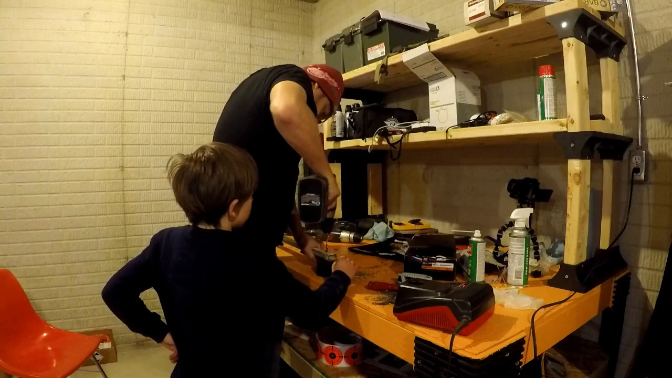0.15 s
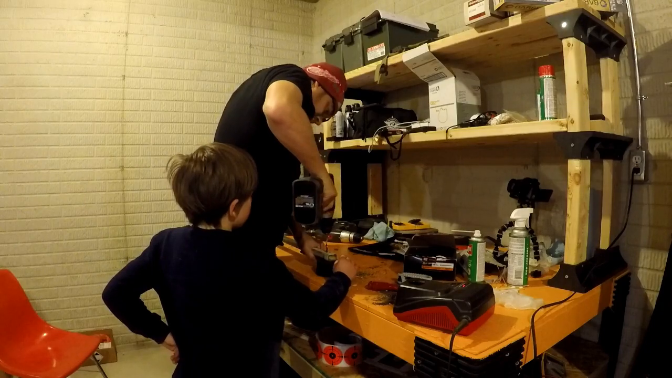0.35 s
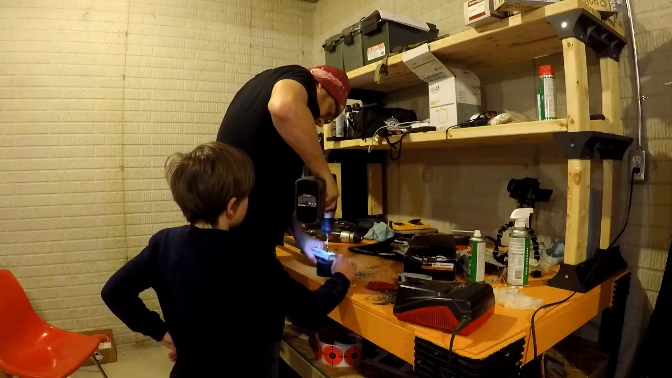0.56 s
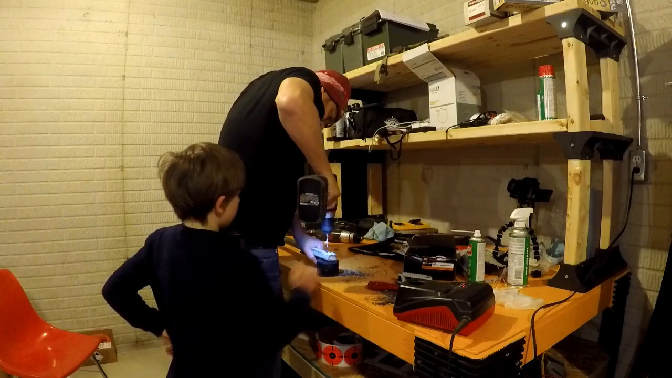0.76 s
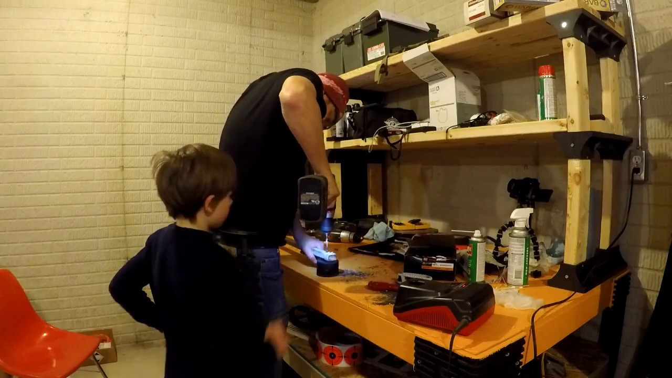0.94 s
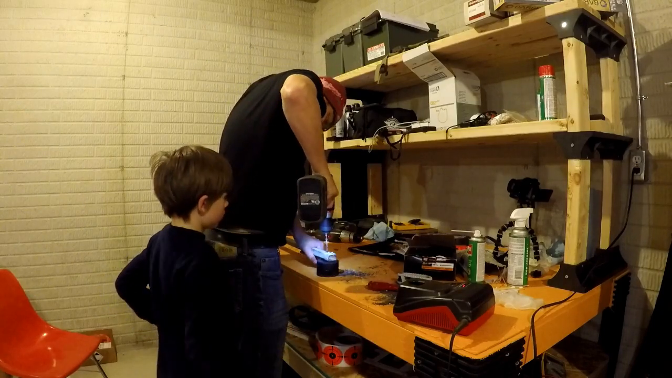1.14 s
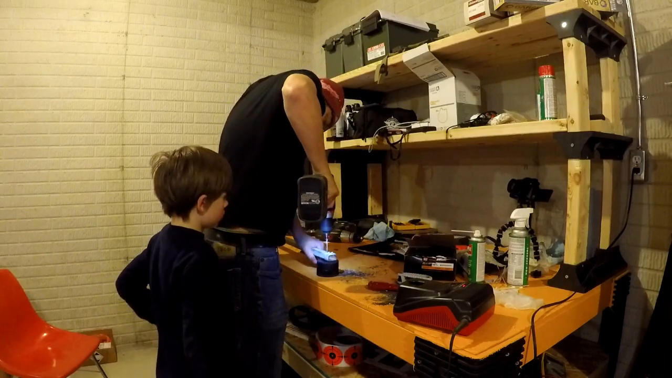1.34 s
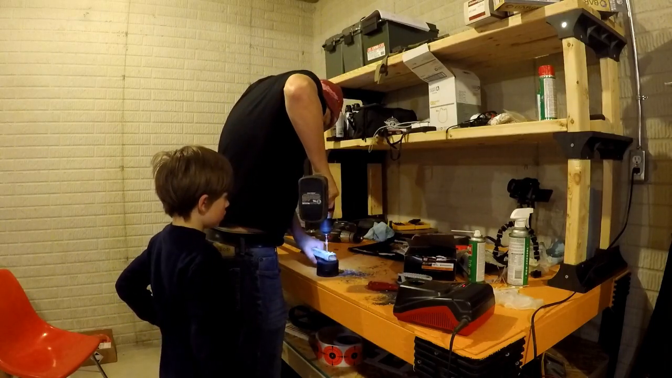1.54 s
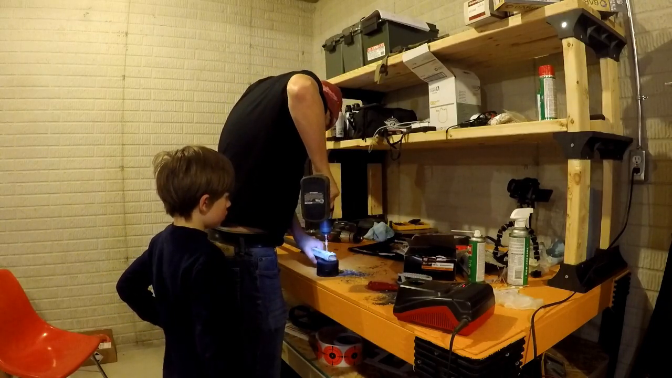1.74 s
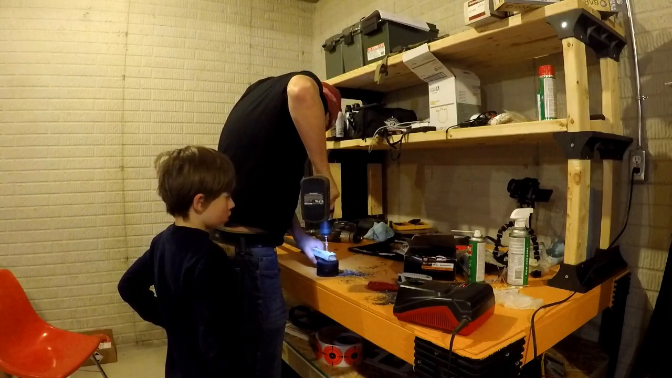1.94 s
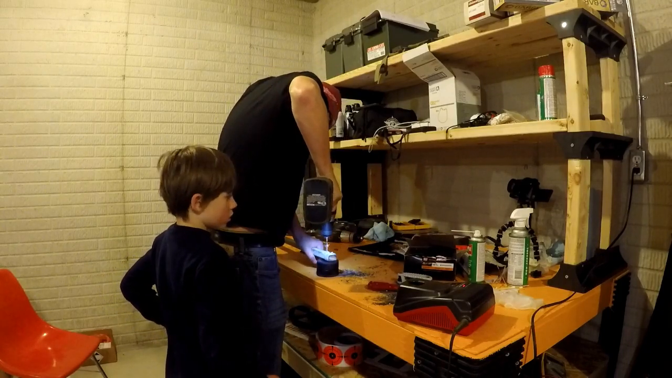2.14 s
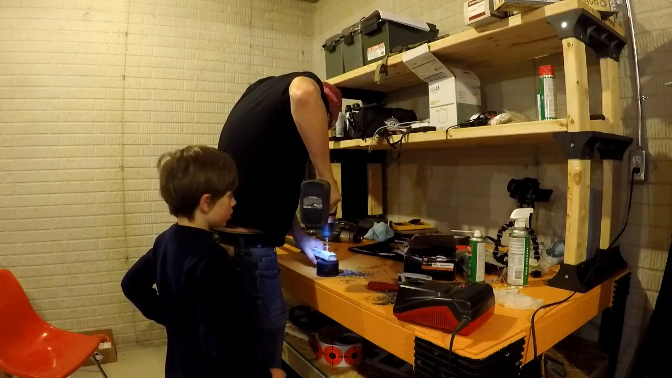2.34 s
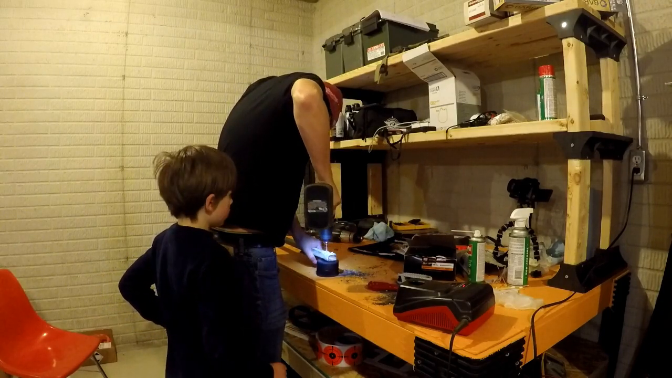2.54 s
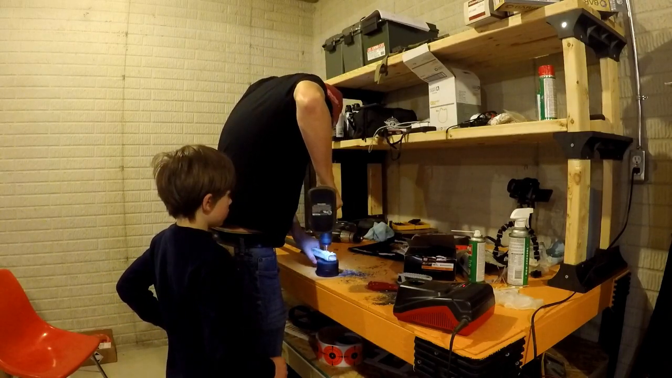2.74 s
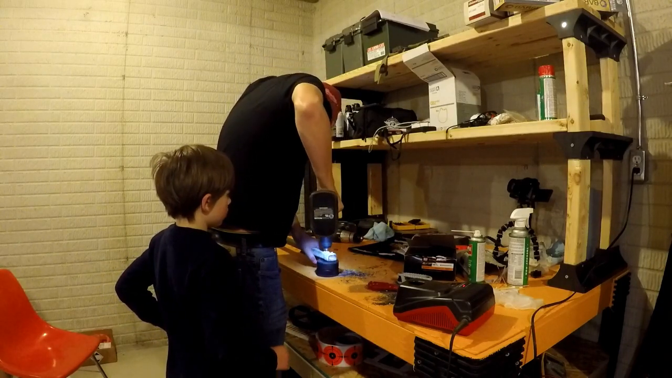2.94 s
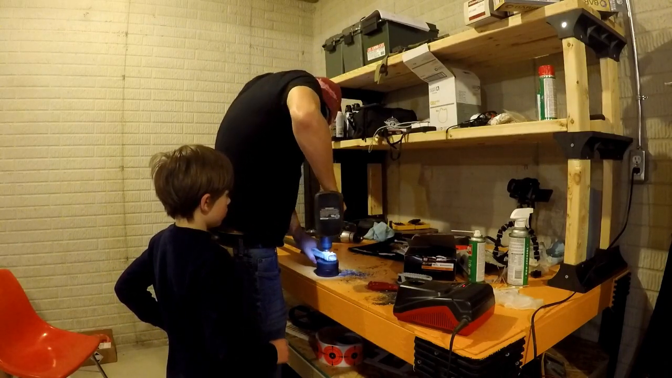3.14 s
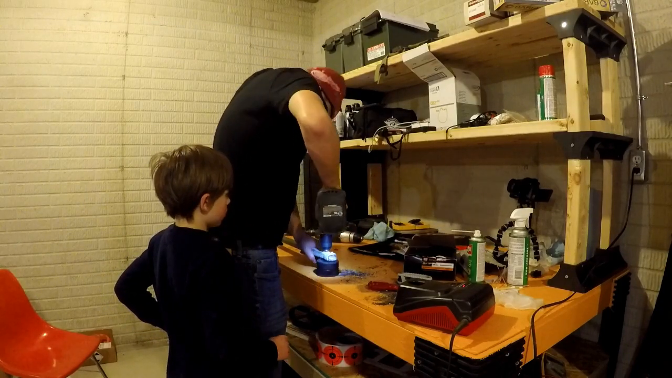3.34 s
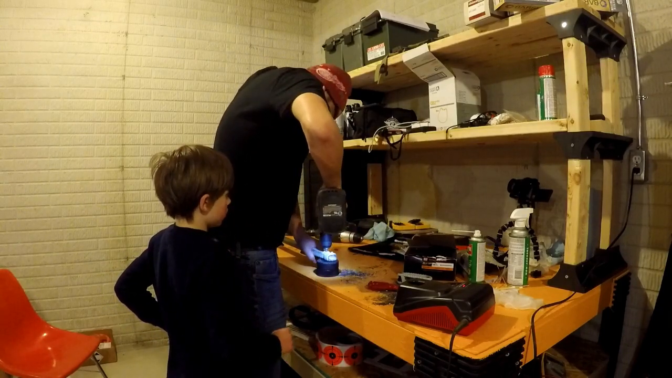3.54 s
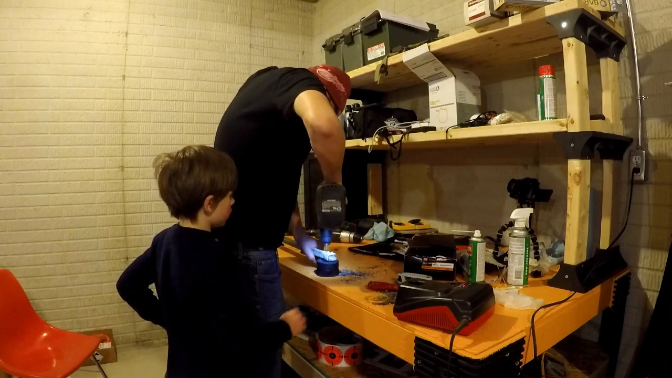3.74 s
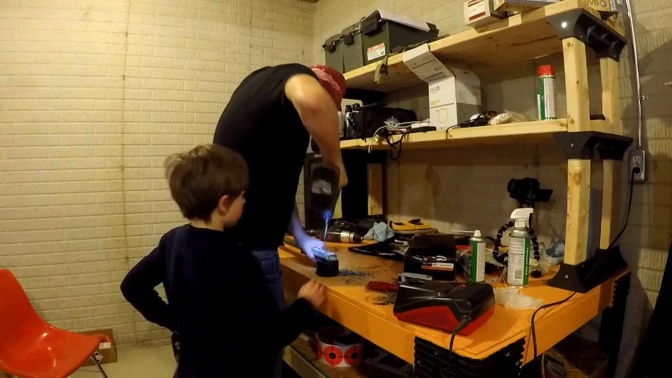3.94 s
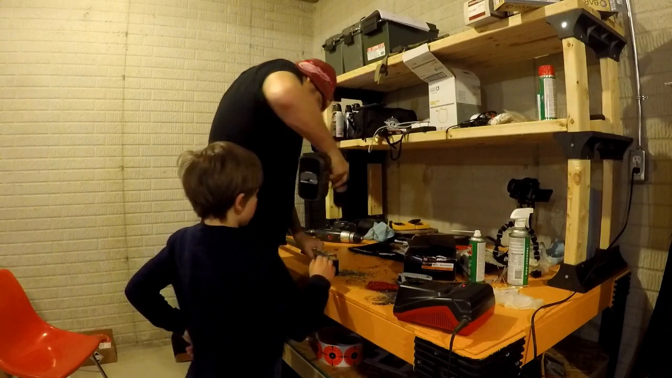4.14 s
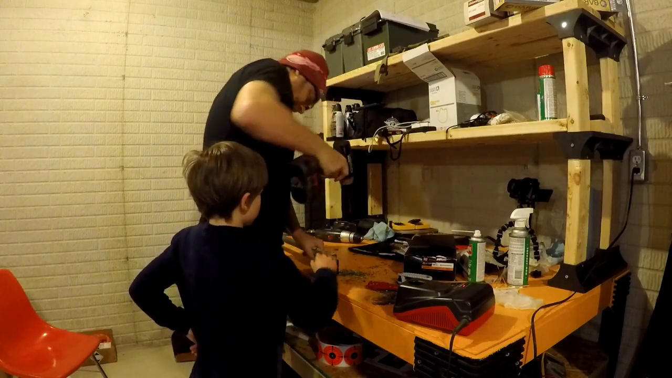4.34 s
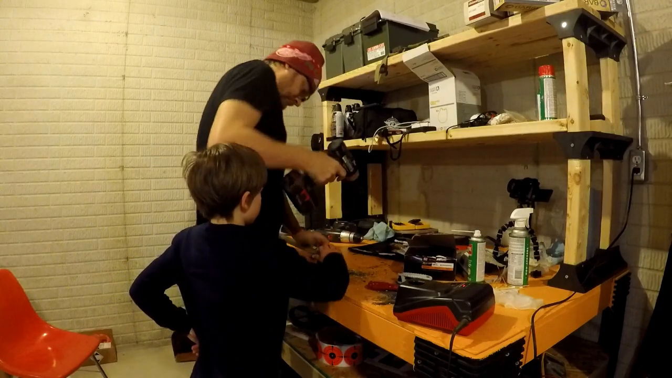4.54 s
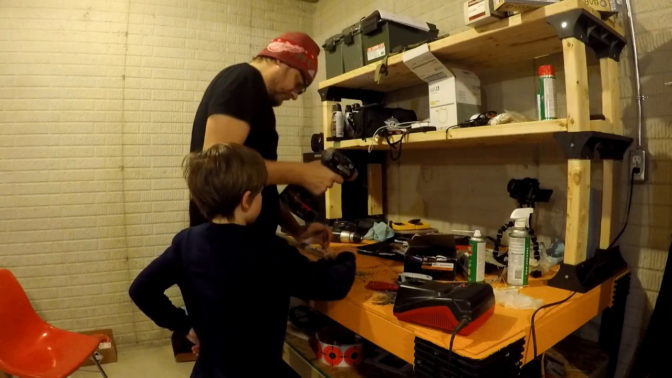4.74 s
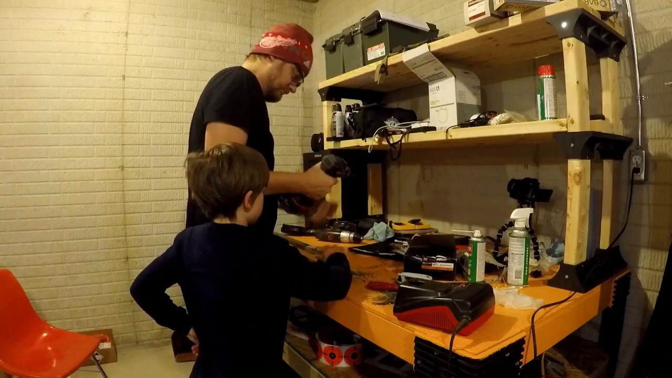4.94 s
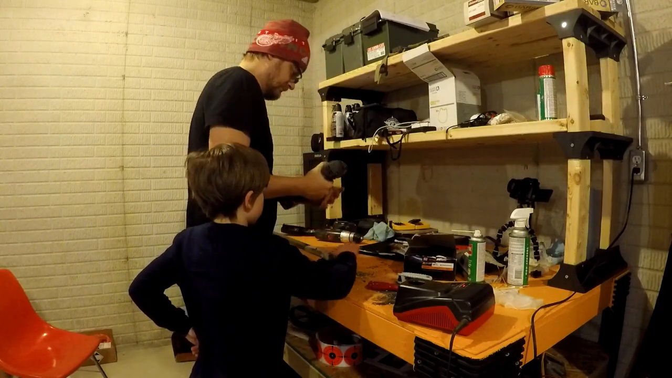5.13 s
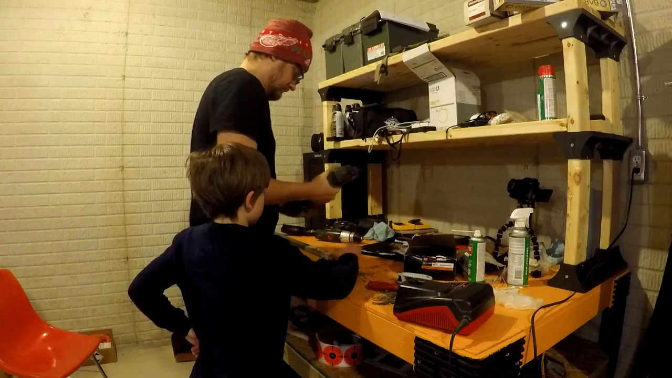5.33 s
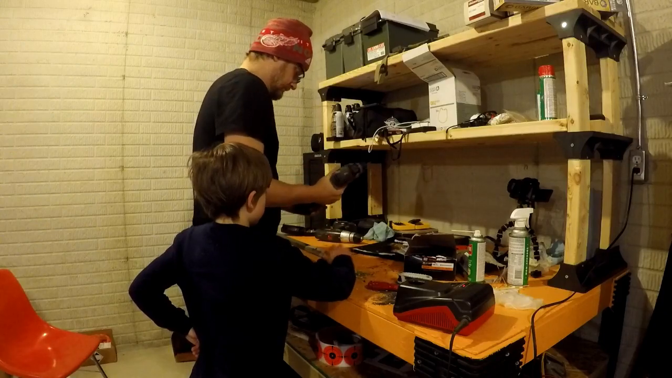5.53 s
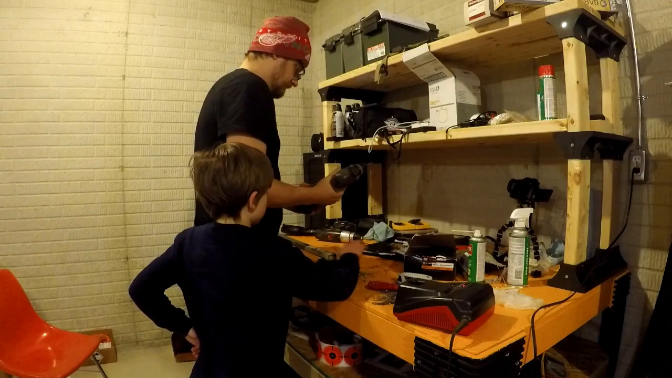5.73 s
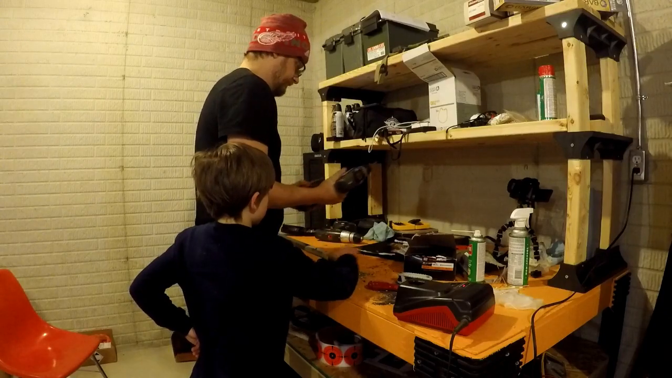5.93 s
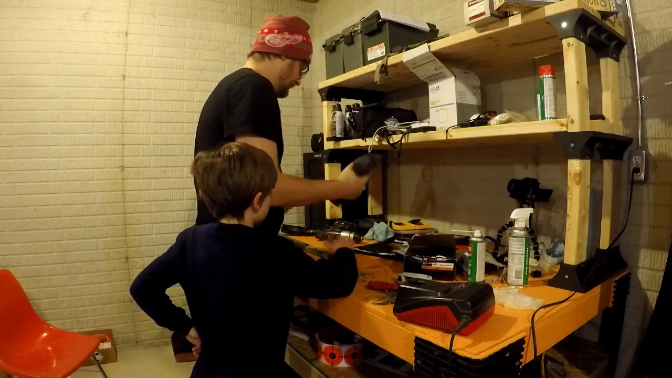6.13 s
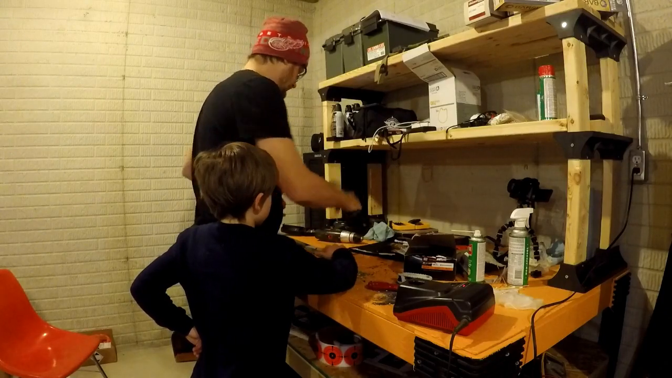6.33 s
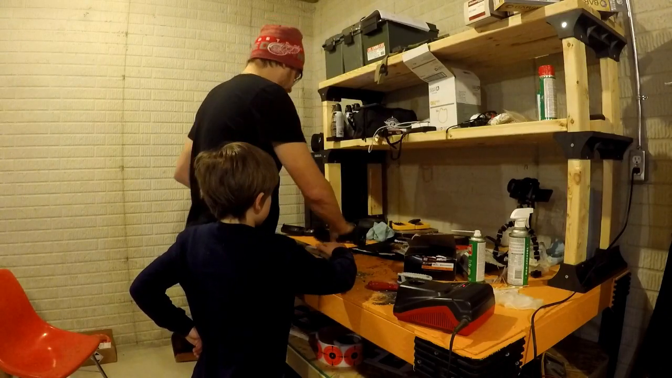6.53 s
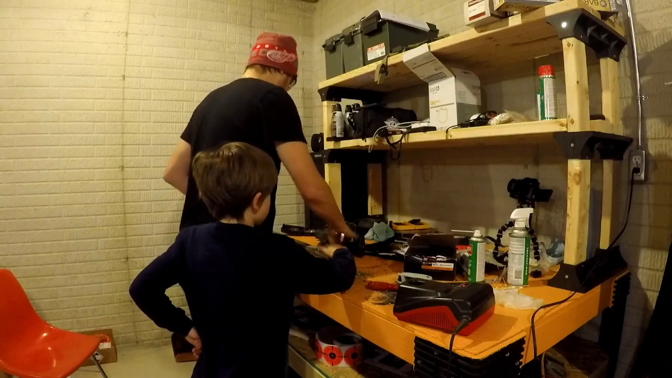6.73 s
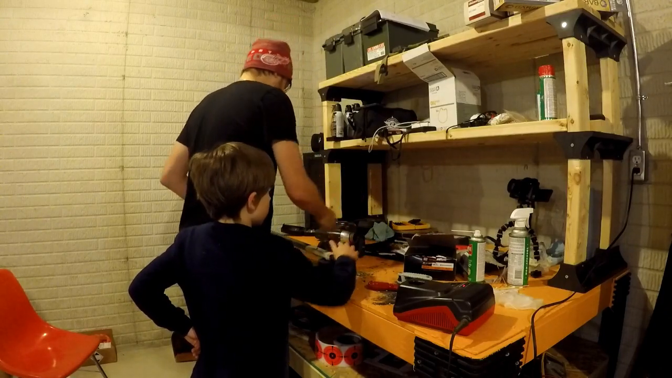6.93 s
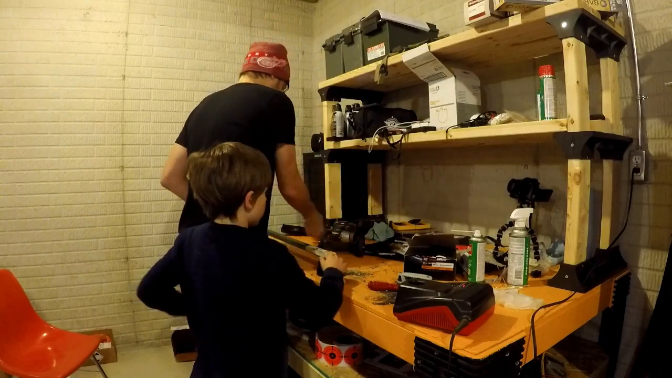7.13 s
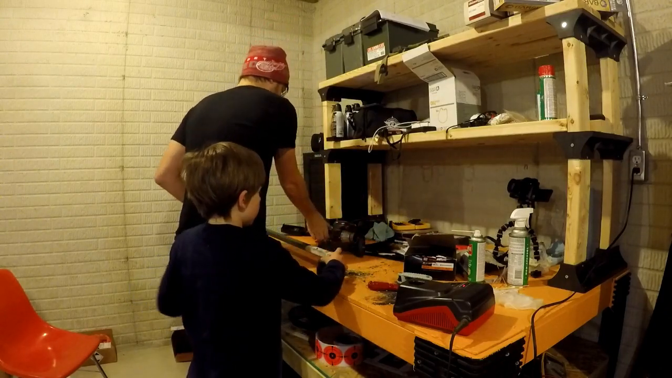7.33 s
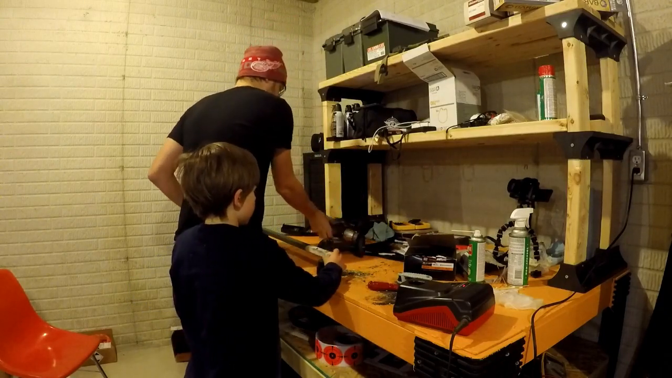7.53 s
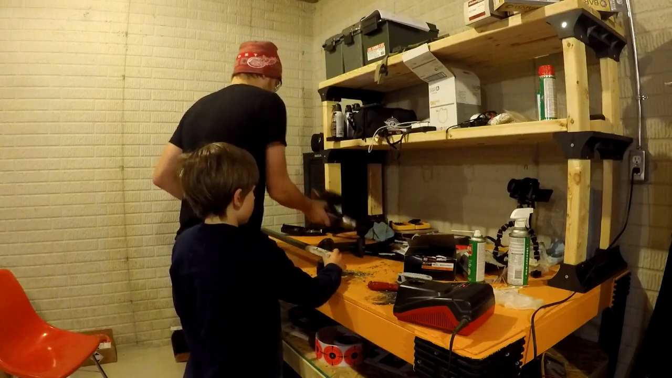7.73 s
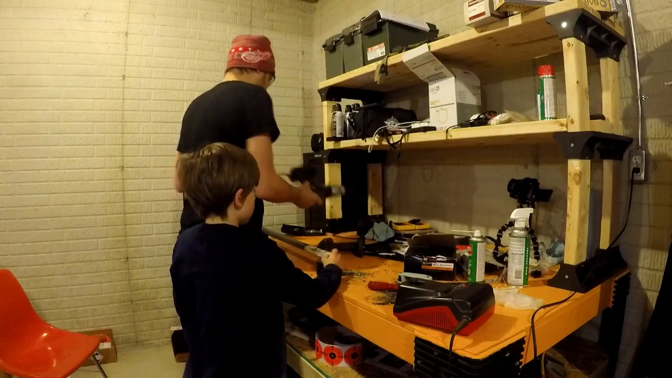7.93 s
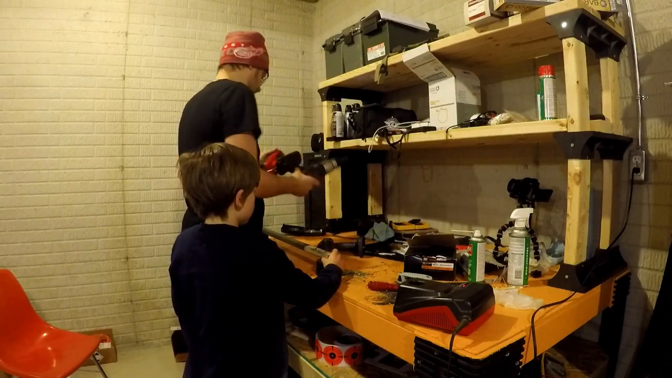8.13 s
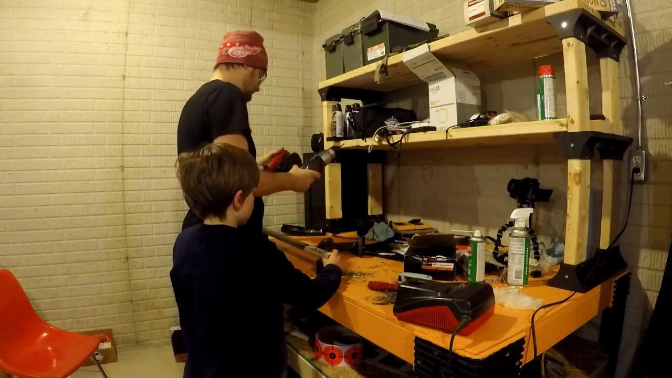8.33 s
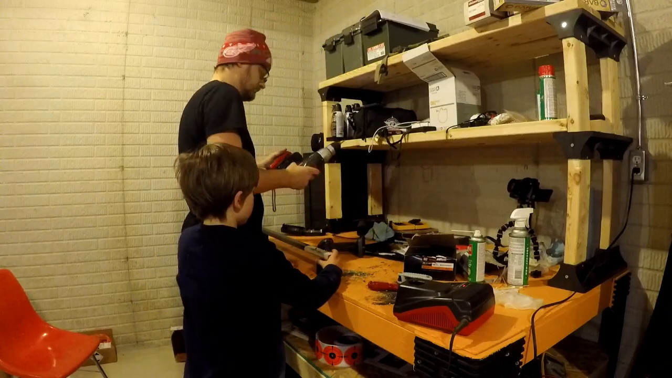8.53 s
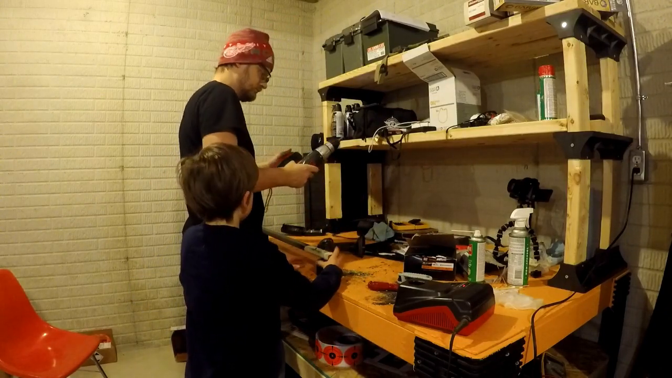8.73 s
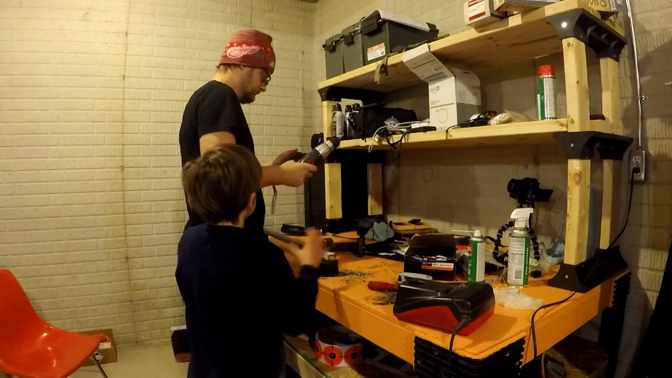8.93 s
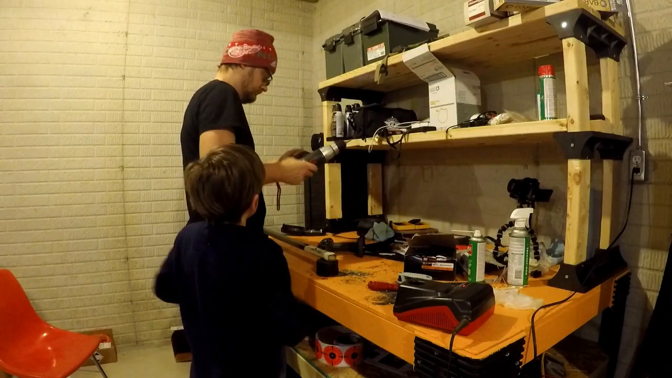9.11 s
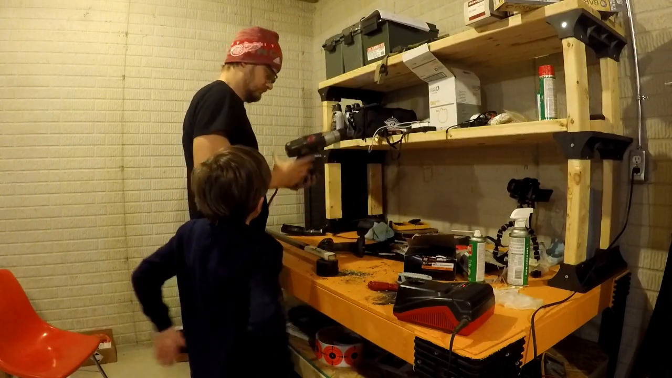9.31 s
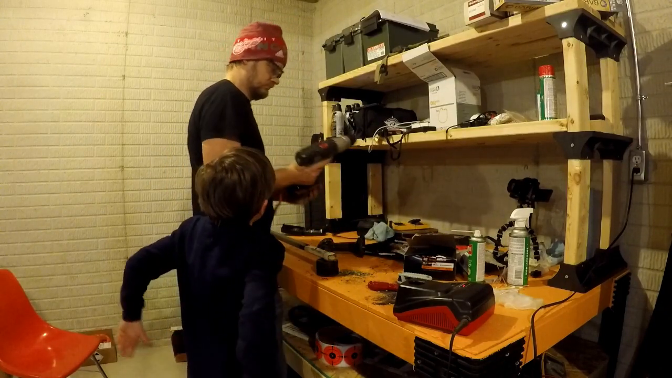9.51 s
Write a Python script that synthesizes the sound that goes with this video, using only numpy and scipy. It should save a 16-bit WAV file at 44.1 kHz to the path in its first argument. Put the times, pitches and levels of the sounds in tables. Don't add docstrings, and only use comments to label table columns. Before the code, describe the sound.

Whirring drill with shrill gear whine drives a screw in a brick basement, brakes sharply, followed by quiet, heavy set-down thuds and crisp latch snaps.

```python
import sys
import numpy as np
from scipy import signal
from scipy.fft import rfft, irfft
from scipy.io import wavfile
from scipy.ndimage import uniform_filter1d

SR = 44100
rng = np.random.default_rng(int(sys.argv[2]) if len(sys.argv) > 2 else 0)


def voltage_ratio(level):
    return 10 ** (np.asarray(level, float) / 20)


def digitize_waveform(pressure):
    field = np.atleast_2d(pressure).T
    bounded = np.clip(field, -1, 1)
    quanta = np.round(bounded * 32767).astype(np.int16)
    wavfile.write(sys.argv[1], SR, quanta)


N = 422037
TIME = np.arange(N) / SR
FULL_S = 1.12

# (time [s], level [dB])
LEAN = [(1.1, -75), (1.7, -51), (1.97, -22.5), (2.38, -17.5), (2.72, -25.5), (3.1, -37.5), (3.7, -25.5),
        (3.95, -23.5), (4.42, -58.5), (5.7, -68), (6.3, -74)]


def evened(x):
    return x / np.sqrt(np.mean(x ** 2) + 1e-20)


def read(points, hz):
    f, value = np.transpose(points)
    return np.interp(np.log(hz + 1), np.log(f + 1), value)


def level_curve(rows):
    s, db = np.transpose(rows)
    return np.interp(TIME, s, db, -120, -120)


def add(mix, s, sound):
    place = mix[round(s * SR):][:len(sound)]
    place += sound[:len(place)]


def resonate(x, hz, width):
    turn = np.exp(2j * np.pi * np.cumsum(hz * np.ones(x.shape[-1])) / SR)
    r = np.exp(-np.pi * width / SR)
    return 2 * (turn * signal.lfilter([1 - r], [1, -r], x / turn)).real


def noise(spectrum, patchy_db, likeness=1.0):
    # (frequency [Hz], likeness [0-1])
    port_likeness = [(60, 0.88), (130, 0.9), (290, 0.6), (640, 0.69), (1410, 0.13), (3100, 1), (6000, 0.49),
                     (9000, 0.32), (13000, 0.8)]
    hz = np.fft.rfftfreq(1024, 1 / SR)
    a, b, c, d, patches = rng.standard_normal((N // 256 + 5, 513, 5)).T
    patches = uniform_filter1d(patches, size=6, axis=0)
    patches = evened(uniform_filter1d(patches, size=10, axis=1))
    same = np.clip(likeness * read(port_likeness, hz), 0, 1)[:, None]
    left = a + 1j * b
    right = same * left + np.sqrt(1 - same ** 2) * (c + 1j * d)
    z = np.array([left, right]) * voltage_ratio(read(spectrum, hz)[:, None] + patchy_db * patches)
    return evened(signal.istft(z, nperseg=1024, noverlap=768)[1][:, :N])


def port(x):
    # (frequency [Hz], gain [dB])
    air_response = [(60, -67), (140, 2.5), (250, 2.5), (2500, -0.5), (2750, -4.5), (3100, -1), (4000, -2.5),
                    (5000, -5), (6300, 2), (7500, -4.5), (9000, -8.5), (11500, -18), (16000, -37)]
    return irfft(rfft(x) * voltage_ratio(read(air_response, np.fft.rfftfreq(N, 1 / SR))), N)


def room(x):
    # (frequency [Hz], t60 [s])
    decay = [(100, 0.22), (500, 0.96), (2000, 0.85), (6000, 0.62), (12000, 0.52)]
    taps = np.zeros((2, SR))
    at = np.arange(200, SR - 20, 20) + rng.integers(0, 20, (2, (SR - 201) // 20))
    np.put_along_axis(taps, at, rng.choice([-1., 1.], at.shape), 1)
    taps[1] = 0.33 * taps[0] + 0.92 * taps[1]
    hz, t, z = signal.stft(taps, SR, nperseg=256)
    tail = signal.istft(z * voltage_ratio(-60 * t / read(decay, hz)[:, None]), SR, nperseg=256)[1]
    bass = signal.butter(2, 220, fs=SR, output="sos")
    tail[1] += signal.sosfilt(bass, tail[0] - tail[1])
    return signal.fftconvolve(x[None], tail / np.linalg.norm(tail[0]), axes=1)[:, :N]


def room_tone():
    # (frequency [Hz], level [dB per Hz])
    tone_colour = [(30, -27), (70, -15), (105, -61), (150, 4), (220, -0.5), (300, -5), (480, -11),
                   (800, -14), (3500, -23.5), (5000, -27), (6400, -23.5), (9900, -28.5), (12500, -38.5),
                   (15500, -44)]
    level_db, left_right_db = -48.5, 1.5
    gain = voltage_ratio(level_db + left_right_db * np.array([[.5], [-.5]]))
    return gain * noise(tone_colour, patchy_db=-0.5, likeness=0.057)


def tins():
    # (time [s], level [dB], frequency [Hz], t60 [s])
    rings = [(4.855, -56, 2300, .12), (5.005, -57, 1700, .2), (5.955, -42, 490, 0.32),
             (5.96, -45.5, 695, 0.48), (6.675, -8, 270, 0.4), (6.68, -19, 690, 0.36),
             (6.75, -20, 460, 0.33), (7.631, -34.5, 580, 0.11), (8.221, -42, 1050, 0.54),
             (8.223, -37, 1446, 0.64), (8.223, -35, 1800, 0.3), (8.322, -42, 1300, 0.32),
             (8.322, -44, 1800, .3), (8.637, -38, 170, 0.22), (8.905, -31.5, 450, 0.42),
             (8.221, -28.5, 246, 0.14)]
    t, out = TIME[:SR // 2], np.zeros(N)
    rattles = rng.standard_normal((len(rings), len(t)))
    for (s, db, hz, t60), rattle in zip(rings, rattles):
        pair = np.sin(2 * np.pi * hz * t) + 0.81 * np.sin(2 * np.pi * 1.045 * hz * t)
        pair = pair + 0.8 * evened(resonate(rattle, hz, 0.14 * hz))
        add(out, s, voltage_ratio(db - 2 - 60 * t / t60) * np.minimum(t / 0.0055, 1) * pair)
    return out


def small_part(drive, hz, low_db, high_db):
    centre = resonate(resonate(drive, hz, .8 * hz), hz, 1.2 * hz)
    low = voltage_ratio(low_db - 6.5) * resonate(resonate(drive, 230, 640), 310, 940)
    spread = voltage_ratio(-14.5 + 2.9 * hz / 1000) * resonate(resonate(drive, 3400, 3400), 2900, 5000)
    treble = voltage_ratio(high_db + 11.0) * resonate(resonate(drive, 4400, 5060), 5460, 7500)
    no_deep_bass = signal.butter(2, 226, "highpass", fs=SR, output="sos")
    return signal.sosfilt(no_deep_bass, centre + spread + low + treble)


def clicks():
    # (time [s], peak [dB], centre [Hz], low knock re peak [dB], treble re peak [dB])
    cracks = [(0.5845, -27, 1900, -18, -29), (0.8292, -11, 2270, -13, -40), (4.012, -24, 3600, -26, 8),
              (6.6668, -8, 1470, 7, -41), (7.3836, -16.5, 1430, -20, -25.5),
              (8.2221, -13.5, 1280, 3.5, -24.5), (8.322, -26, 1390, 9.5, -25), (8.6375, -25, 2130, 15, -12),
              (8.9002, -14, 2060, -26, -33), (8.9065, -22, 3120, 3, 3), (8.936, -3, 3540, -36, -8),
              (9.0178, -7.5, 3200, -44, -2)]
    # (time [s], peak [dB], centre [Hz], low knock re peak [dB], treble re peak [dB])
    touches = [(4.717, -53, 3800, 6, -2), (4.745, -47, 2090, -1, -15), (4.856, -50, 2410, -1, -16),
               (5.006, -46.5, 1550, -3, -28), (5.728, -56, 3920, 2, 5), (5.869, -39.5, 1780, -20, -22),
               (5.893, -37, 1640, -10, -13.5), (5.944, -35.5, 1700, -4, -12), (5.959, -43, 1500, 11, -4.5),
               (6.235, -51.5, 1900, -11, -5), (6.317, -44, 3090, 7, -14), (6.7234, -40, 1290, 31, -6),
               (7.172, -43.5, 1250, 21, -27), (7.615, -36, 2100, -1, -28), (8.613, -49, 4500, -20, 0),
               (8.698, -38, 1480, -11, -9), (8.842, -44.5, 1920, -2, -2), (9.389, -42.5, 2150, -5, -8),
               (9.4411, -38, 1964, -10, -13)]
    sharp_db = -31
    touch_s, crack_s = 0.027, 0.059
    near, far, t = np.zeros(N), np.zeros(N), TIME[:9000]
    rows = cracks + touches
    for (s, db, hz, low_db, high_db), grit in zip(rows, rng.standard_normal((len(rows), len(t)))):
        hard = np.clip((db - sharp_db) / 8, 0, 1)
        rise = 0.001485 + .02 * (1 - hard)
        length = touch_s + (crack_s - touch_s) * hard
        scuff = grit * np.minimum(t / rise, 1) * voltage_ratio(-60 * t / max(length, .005) / 2)
        pulse = 1. * (t == 0)
        drive = scuff + hard * (4 * pulse + 2 * grit * np.exp(-t / .0015))
        gain = voltage_ratio(db) / abs(small_part(drive, hz, -60, -60)).max()
        add(near, s, gain * small_part(drive, hz, low_db, high_db))
        energy = np.linalg.norm(scuff)
        add(far, s + rise, gain * energy * small_part(pulse, hz, low_db, high_db))
    return port(near), port(far)


def clacks():
    # (frequency [Hz], level [dB], t60 [s])
    base, latch, brake = [(1050, -5.5, 0.044), (1477, 4, .04), (1860, -2.5, 0.036), (2460, -1, 0.021),
                          (3010, -6.5, .025)], [(1700, -2.5, .04), (2150, -4, .05), (3160, -4, 0.048),
                                        (4160, 0, 0.024), (5550, -11.5, 0.033), (5930, -6, .06),
                                        (6640, -5.5, 0.05)], [(3490, -0.5, 0.061), (3900, 1.5, 0.058),
                                                       (4400, -4, .05), (6030, 2.5, .06)]
    # (time [s], level [dB])
    base_hits = [
        (6.6662, -14.5),
        (6.6685, -17.5),
        (6.6772, -20),
        (7.3836, -33),
        (.8292, -37),
        (.584, -47),
    ]
    # (time [s], level [dB])
    latch_hits = [
        (8.909, -33),
        (8.914, -22),
        (8.9357, -18),
        (8.942, -29),
        (8.952, -31),
        (9.0175, -16),
        (9.0217, -27),
        (9.031, -31),
    ]
    # (time [s], level [dB])
    brake_hits = [
        (.549, -62),
        (.566, -52),
        (.585, -44),
        (.829, -28),
        (4.718, -58),
        (4.857, -60),
        (5.008, -62),
        (4.005, -26),
        (4.015, -20.5),
        (4.053, -29.5),
    ]
    t, out = TIME[:4000], np.zeros(N)
    for modes, hits in ((base, base_hits), (latch, latch_hits), (brake, brake_hits)):
        hz, mode_db, t60 = np.transpose(modes)[..., None]
        for (s, db), (detune, vary) in zip(hits, rng.standard_normal((len(hits), 2, len(modes), 1))):
            level = voltage_ratio(db + mode_db + 3.4 * vary - 60 * t / t60)
            ring = level * np.sin(2 * np.pi * hz * (1 + .015 * detune) * t)
            add(out, s, np.minimum(t / .0004, 1) * ring.sum(0))
    return out


def bench(force, lo, hi):
    # (frequency [Hz], width [Hz], level [dB])
    board_modes = [(41, 15.3, -7.5), (65.8, 11.3, -8), (108.7, 36, -12), (150.2, 16.8, 5), (167.8, 23.6, 3),
                   (199.8, 6.4, 2), (228.5, 15, -1.5), (276, 57, -17), (352.4, 23, -10), (401, 17, -20)]
    return sum((-1) ** k * voltage_ratio(db) * resonate(force, hz, width)
               for k, (hz, width, db) in enumerate(board_modes[lo:hi]))


def thuds():
    # (time [s], peak [dB], slap 0.4-1.5 kHz re peak [dB], rumble t60 [s])
    blows = [(0.602, -37.5, 10, 0.46), (0.833, -26, 1, 0.51), (1.13, -24, -3, 0.4), (1.955, -9, -10, 1),
             (2.435, 2.5, -8, 0.74), (2.454, 0.5, -10, 0.28), (2.55, -22, -11, 0.44),
             (3.84, -41, -10, 0.41), (4.368, -29.5, -13, 0.74), (6.423, -32, -21, 0.36),
             (6.478, -31, -32.5, 0.49), (6.652, -11, -40, .3), (6.667, -1.5, -6.5, 0.6),
             (6.677, 10.5, -13.5, 0.76), (6.73, -4.5, -6, 1), (6.779, -4, -17, 0.71),
             (6.892, -41, -32, 0.29), (7.196, -17.5, -37, 1), (7.384, 4.5, -19, 0.32),
             (7.402, -1, -12, 0.19), (7.506, -3, -26, 0.14), (7.55, -15, -13.5, 0.47),
             (7.635, -4.5, -31, 0.087), (7.708, -15, -29, 0.35), (7.819, -25, -31, 0.54),
             (7.928, -25, -40, 1), (8.858, -31.5, -3, 0.3), (9.376, -39, 8, 0.4)]
    force, slap, t = np.zeros(N), np.zeros(N), TIME[:SR // 2]
    for (s, db, slap_db, t60), grit in zip(blows, rng.standard_normal((len(blows), len(t)))):
        blow = np.sin(np.pi * np.minimum(t / 0.0055, 1)) + 0.59 * grit * voltage_ratio(-60 * t / max(t60, .03))
        add(force, s, voltage_ratio(db + 9.0) * blow)
        add(slap, s, voltage_ratio(db + slap_db + 1.0 - 60 * t / 0.22) * grit)
    loose = voltage_ratio(-10.5) * resonate(resonate(force, 320, 166), 305, 260)
    airborne = resonate(resonate(slap, 340, 750), 550, 990)
    cut = signal.butter(2, [125, 5000], "bandpass", fs=SR, output="sos")
    return signal.sosfilt(cut, bench(force, lo=3, hi=10) + loose + airborne)


def uneven_jolts(swing_db, size):
    jolts = rng.standard_normal(N)
    return jolts * voltage_ratio(swing_db * evened(uniform_filter1d(rng.standard_normal(N), size=size)))


def sway():
    # (time [s], level [dB])
    pushes = [(2.42, -1.5), (2.54, -5), (3.0, -26), (3.85, -26), (6.41, -49), (6.66, -34), (6.79, -9.5),
              (7.35, -7.5), (7.51, -8), (7.64, -17.5), (7.8, -37), (7.9, -31.5), (8.88, -35)]
    rise_s, fall_db_per_s = 0.047, 205
    settle_db, settle_db_per_s = -15, 29
    jolts = uneven_jolts(1.6, size=2000)
    band = signal.butter(3, [48, 105], "bandpass", fs=SR, output="sos")
    level, t = voltage_ratio(level_curve(LEAN)), TIME[:2 * SR]
    fall = voltage_ratio(-fall_db_per_s * t) + voltage_ratio(settle_db - settle_db_per_s * t)
    after = np.minimum(t / rise_s, 1) * fall
    for s, db in pushes:
        add(level, s, voltage_ratio(db) * after)
    return voltage_ratio(-7.5) * level * evened(signal.sosfilt(band, bench(jolts, lo=0, hi=3)))


def shaft_speed():
    # (time [s], speed [turns/s])
    speed = [(.6, 112), (.77, 153), (.92, 193), (1.07, 215), (1.13, 313), (1.22, 336), (1.32, 349),
             (1.62, 348), (1.82, 338), (2.17, 331), (2.42, 340), (2.62, 321), (2.82, 298), (2.94, 274),
             (3.09, 259), (3.25, 273), (3.4, 288), (3.65, 304), (3.7, 316), (3.88, 346), (3.95, 350),
             (4.02, 336)]
    return np.interp(TIME, *np.transpose(speed))


def whine(hz, multiple, start, end, db, wobble, taper=.35):
    hz = hz[round(start * SR):round(end * SR)]
    slow, quick = rng.standard_normal((2, len(hz)))
    drift = evened(uniform_filter1d(slow, size=1800))
    flutter_db = 2 * evened(uniform_filter1d(quick, size=800))
    tone = np.sin(2 * np.pi * np.cumsum(multiple * hz * (1 + wobble * drift)) / SR)
    return start, np.sqrt(2) * voltage_ratio(db + flutter_db) * tone * signal.windows.tukey(len(hz), taper)


def whines():
    # (multiple of shaft speed, start [s], end [s], level [dB], pitch wobble)
    light_orders = [(11.7, .73, .84, -46, .006), (11.8, .82, 1.12, -46, .005), (2.42, .95, 1.12, -46, .005),
                    (4.9, .8, .98, -46, .008), (3, .6, .76, -50, .04), (12, 1.14, 1.85, -32.5, .0006),
                    (10.5, 1.36, 1.6, -37, .002), (15.2, 2.25, 2.48, -36, .002), (12, 1.7, 2.4, -37, .001),
                    (12, 2.33, 2.85, -33, .002), (2.3, 1.9, 2.3, -41, .02), (12.6, 1.6, 2, -40, .001),
                    (15, 1.2, 2.45, -40, .001), (17, 1.2, 2.35, -41, .001), (20, 1.2, 2.35, -38, .001),
                    (5.25, 1.12, 1.9, -40, .003), (1, 1.15, 2.35, -42, .005), (1.25, 1.2, 2.3, -45, .003),
                    (2.45, 1.2, 2.3, -51, .003), (3, 1.2, 2.3, -49, .003)]
    # (multiple of shaft speed, start [s], end [s], level [dB], pitch wobble)
    loaded_orders = [(11.1, 2.66, 2.88, -32, .004), (11.2, 2.86, 3.02, -32, .003),
                     (12.1, 2.78, 3.04, -34, .004), (11.2, 2.95, 3.72, -31.5, .0035),
                     (12, 3.13, 3.32, -33, .003), (12, 3.34, 3.68, -33, .009), (12, 3.64, 3.92, -35, .003),
                     (12, 3.86, 4.02, -39, .004), (10.15, 3.35, 3.8, -36, .003),
                     (12.6, 3.35, 3.75, -33, .01), (22.4, 2.75, 3.3, -36, .003),
                     (22.8, 2.75, 3.3, -38, .003), (2.45, 2.68, 3.12, -34, .011),
                     (2.43, 3.08, 3.36, -30.5, .007), (2.4, 3.3, 3.8, -38, .011),
                     (5.2, 2.92, 3.18, -39, .009), (4.82, 2.98, 3.2, -40, .008),
                     (3.45, 2.95, 3.2, -41, .004), (1, 2.9, 3.62, -34, .008), (1, 3.62, 4.08, -39, .014)]
    # (start [s], end [s], level [dB], pitch wobble)
    chopper = (.562, 1.18, -44, .0005)
    chopper_hz, settle_hz, settle_s = 6630, 140, .12
    out, shaft = np.zeros(N), shaft_speed()
    for row in light_orders + loaded_orders:
        add(out, *whine(shaft, *row))
    sung_hz = chopper_hz - settle_hz * np.exp(-abs(TIME - chopper[0]) / settle_s)
    add(out, *whine(sung_hz, 1, .7, 1.14, -43, .0005))
    add(out, *whine(sung_hz, 1, *chopper, taper=.08))
    return out


def drill():
    # (frequency [Hz], level [dB per Hz])
    hiss_colour, gearbox_colour = [(710, -63), (1200, -17.5), (1760, -6.5), (2570, -15), (2740, -12),
                                   (2890, -4), (4070, -4), (4720, -4), (6110, 0), (6940, -1), (8240, -12),
                                   (10300, -19.5), (11400, -34), (13200, -28), (15500, -41)], [(150, -26), (260, -2.5), (341, -6), (393, -5.5),
                                                 (433, -3.5), (1160, -7), (1770, -5), (2600, -3),
                                                 (3380, -44), (5720, -120)]
    # (time [s], level [dB])
    effort = [
        (.575, -61),
        (.592, -45),
        (.66, -33.5),
        (.84, -27.5),
        (1.08, -26),
        (1.18, -19.5),
        (3.95, -19.5),
        (4.07, -28),
        (4.1, -32),
        (4.6, -81),
    ]
    idle_band_hz, mesh_teeth = 3700, 11.6
    bite_db_per_turn = 0.0267
    light_lean_db, shake_per_lean = -26.5, 0.79
    shaft, half = shaft_speed(), TIME < FULL_S

    mesh_hz = np.where(half, idle_band_hz, mesh_teeth * shaft)
    beat = 1 + 0.15 * np.cos(2 * np.pi * np.cumsum(shaft) / SR)
    bite_db = bite_db_per_turn * (shaft.max() - shaft) * (TIME > FULL_S)
    air = noise(hiss_colour, patchy_db=1.34)
    mesh = voltage_ratio(-6.5 + 5.3 * half + bite_db) * resonate(air, mesh_hz, 890)
    hiss = evened(beat * air + mesh)

    gearbox = voltage_ratio(-7 - 0.5 * half) * noise(gearbox_colour, patchy_db=1.0)

    jolts = uneven_jolts(0.88, size=2500)
    pressed_db = shake_per_lean * np.maximum(level_curve(LEAN) - light_lean_db, 0)
    eased_db = -9.5 * (TIME > 3.92)
    shake = voltage_ratio(-8.5 + pressed_db + 1 * half + eased_db) * evened(port(bench(jolts, lo=3, hi=9)))
    return voltage_ratio(level_curve(effort)) * (hiss + gearbox + shake)


def scene():
    tones, knocks = whines(), thuds() + clacks()
    ticks, echoes = clicks()
    motor = voltage_ratio(2.5) * tones + room(voltage_ratio(-5) * tones)
    wet = room(voltage_ratio(-9.0) * knocks + voltage_ratio(-1.5) * echoes)
    direct = knocks + voltage_ratio(-1.5) * ticks + sway() + tins()
    return motor + direct + wet + drill() + room_tone()


def band_limit(x):
    return signal.sosfilt(signal.butter(12, 15960, fs=SR, output="sos"), x)


def record(dry):
    # (frequency [Hz], left over right [dB])
    tilt = [(60, -1), (130, -1), (290, -2.5), (640, -6.5), (1410, 1), (3100, 0), (6820, 0.5), (15000, -8)]
    # (frequency [Hz], left leads by [rad])
    lead = [(60, 0.28), (300, 0.33), (700, 1.1), (1400, 0.64), (6000, 0.074), (9000, 2.12), (15000, 0.31)]
    hz = np.fft.rfftfreq(N, 1 / SR)
    half = voltage_ratio(read(tilt, hz) / 2) * np.exp(.5j * read(lead, hz))
    ports = irfft(rfft(dry) * np.array([half, 1 / half]), N)

    power_db = 10 * np.log10(abs(uniform_filter1d((ports ** 2).mean(0), size=300)) + 1e-12)
    fall = TIME * 120.0
    held_db = np.maximum.accumulate(power_db + fall) - fall
    over_db = np.maximum(held_db + 17.0, 0)
    ducked = ports / voltage_ratio(0.19 * uniform_filter1d(over_db, size=200))

    edge = voltage_ratio(-np.clip((hz - 15190) / 10, 0, 90))
    limited = irfft(rfft(np.tanh(ducked / 1.364) * 1.221) * edge, N)
    return band_limit(limited)


dry = scene()
out = record(dry)
digitize_waveform(out)
```